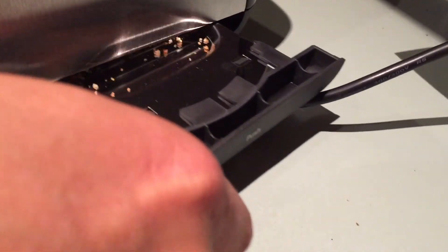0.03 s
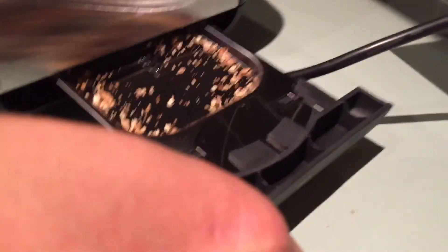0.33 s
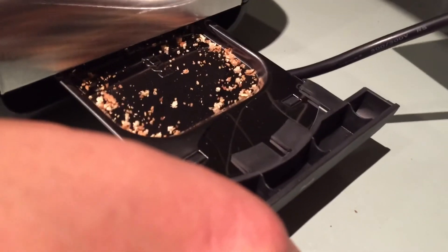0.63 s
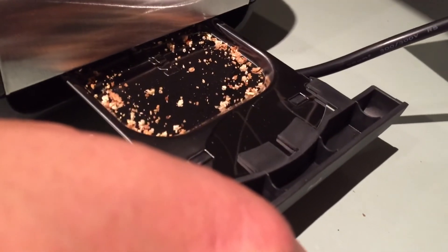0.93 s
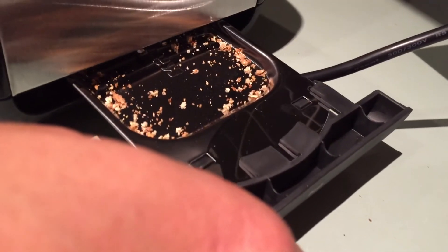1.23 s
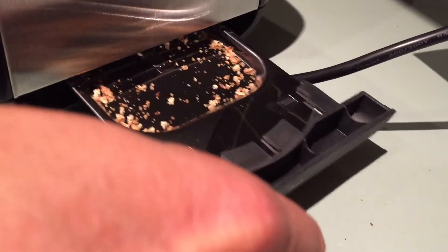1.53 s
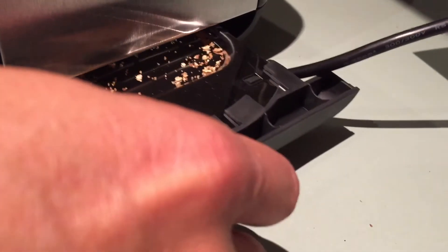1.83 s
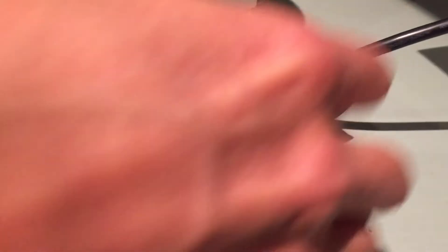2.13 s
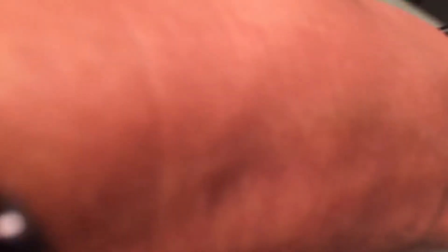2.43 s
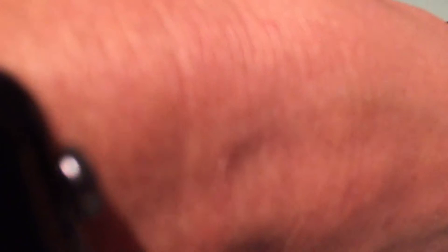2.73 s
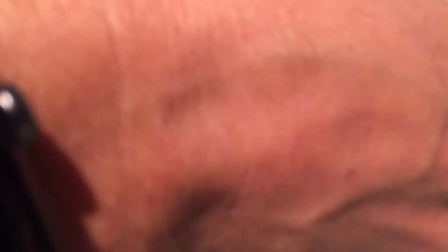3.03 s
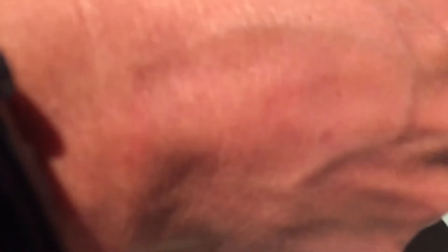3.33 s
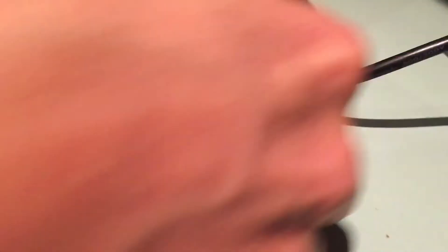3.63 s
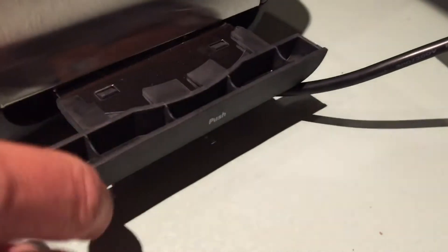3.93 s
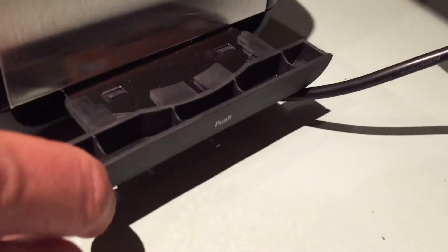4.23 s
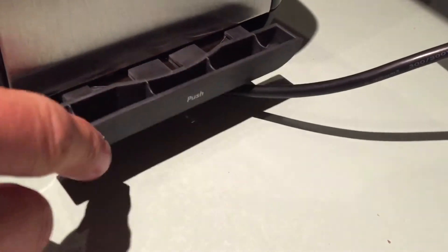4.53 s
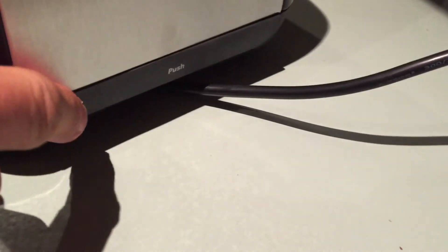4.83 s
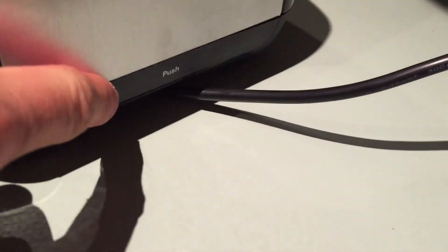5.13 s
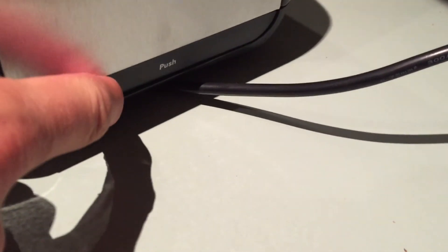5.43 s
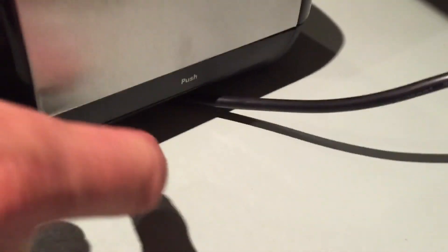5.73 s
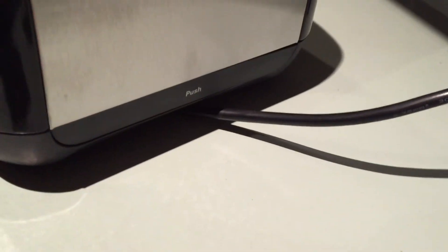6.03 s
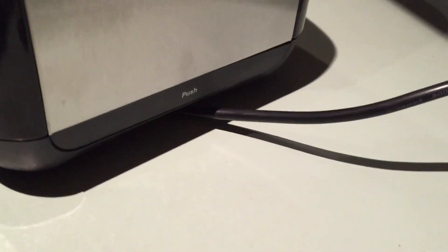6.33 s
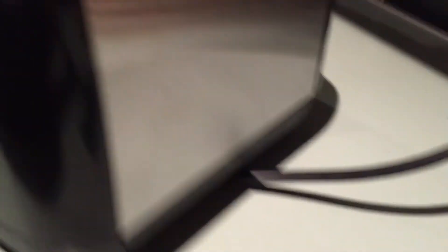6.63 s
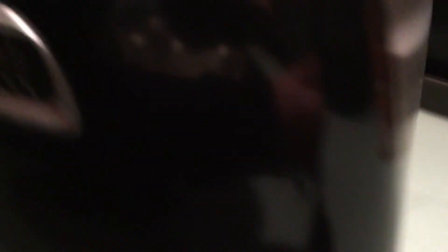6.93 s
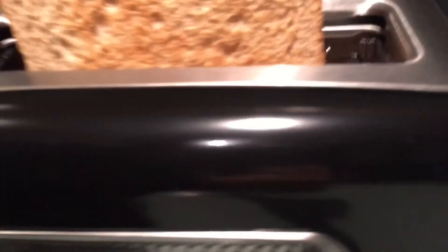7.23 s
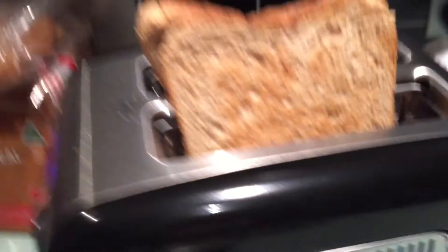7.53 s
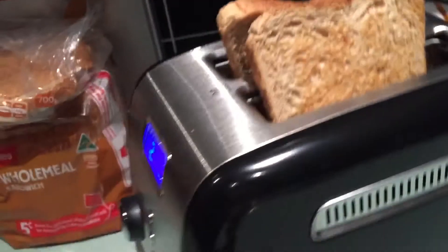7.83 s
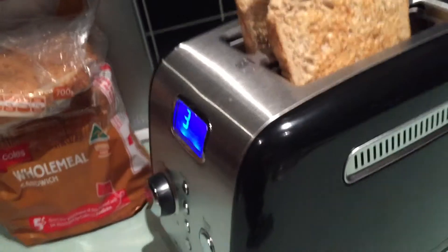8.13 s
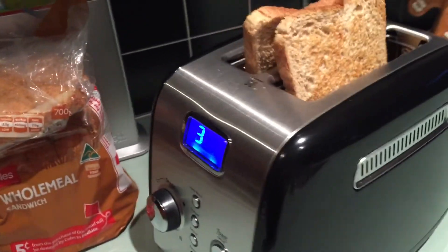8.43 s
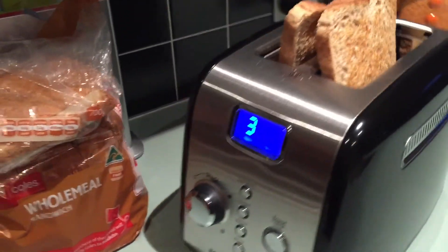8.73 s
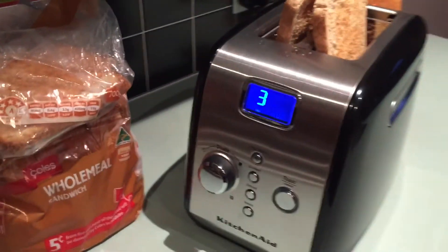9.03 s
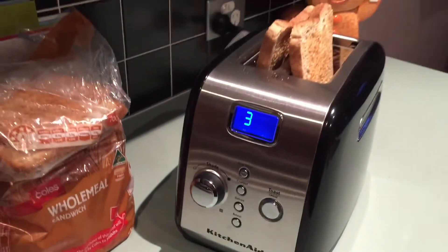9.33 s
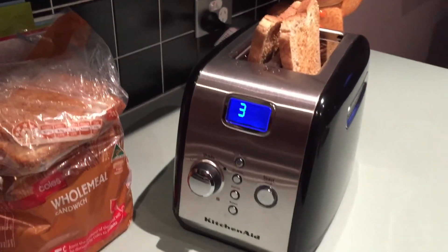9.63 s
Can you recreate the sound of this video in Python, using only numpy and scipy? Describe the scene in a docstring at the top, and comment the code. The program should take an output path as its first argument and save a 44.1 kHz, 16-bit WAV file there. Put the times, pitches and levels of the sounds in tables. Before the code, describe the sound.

Metal scraping, rattling knocks and sharp latch clicks as a thin tray is pulled from a toaster and pushed home.

```python
"""In a quiet kitchen, a toaster's crumb tray is pulled out to its stop, nudged back along its guides
and pressed home until the push latch clicks. Knocks shake the steel shell, and two jolts set the thin
tray ringing and toss up crumbs. Between knocks the tray grates, rasps and squeaks, and its plastic front
rubs. The toaster rocks on its feet with two low booms, and an appliance hums.
A hand-held phone hears it from close by and picks up soft handling bumps."""
import sys
import numpy as np
from scipy import signal
from scipy.fft import rfft, irfft, next_fast_len
from scipy.io import wavfile

SR = 44100
rng = np.random.default_rng(int(sys.argv[2]) if len(sys.argv) > 2 else 0)


def int16_out(signal):
    """Quantize to a 16-bit WAV file."""
    q = np.round(np.clip(np.atleast_2d(signal).T, -1, 1) * 32767)
    wavfile.write(sys.argv[1], SR, q.astype(np.int16))


N = 431298
T = np.arange(N) / SR
RING_T = T[:30000]  # the clock for one ringing sound, in seconds


def undb(db):
    """Turn decibels into a number to multiply by."""
    return 10 ** (np.asarray(db) / 20)


def unit(x):
    """Scale a sound so that its average power is 1."""
    return x / np.sqrt(np.mean(x ** 2))


def fade(t, decay):
    """Die away smoothly; a decay is the time it takes to drop by 60 dB."""
    return np.exp(-np.log(1000) * t / decay)


def add(track, s, sound):
    """Mix a sound into a track, starting at s seconds."""
    i = max(int(s * SR), 0)
    track[i:i + len(sound)] += sound[:N - i]


def colour(x, points):
    """Shape a sound's lows and highs along (f/Hz, level/dB) points; power 1."""
    hz, db = np.transpose(points)
    size = next_fast_len(len(x))
    f = np.maximum(np.fft.rfftfreq(size, 1 / SR), 1)
    gain = undb(np.interp(np.log(f), np.log(hz), db)) * np.minimum(f / hz[0], 1) ** 2
    return unit(irfft(rfft(x, size) * gain, size)[:len(x)])


def band(hz, width, size):
    """Noise around one pitch; power 1."""
    edges = np.clip([hz - width / 2, hz + width / 2], 20, SR / 2 - 100)
    bandpass = signal.butter(2, edges, "band", fs=SR, output="sos")
    return unit(signal.sosfilt(bandpass, rng.standard_normal(2 * size))[size:])


def walk(rate):
    """Wander at random by about 1, with `rate` new values a second."""
    points = rng.standard_normal(int(T[-1] * rate) + 2)
    return np.interp(T * rate, np.arange(len(points)), points)


def burst(hz, width, envelope):
    """A puff of noise with the shape and energy of the envelope, its loudness curve."""
    x = band(hz, width, len(envelope)) * envelope
    return unit(x) * np.sqrt(np.mean(envelope ** 2))


def ring(tones, force_db, clock=RING_T):
    """A struck part rings, each tone as hard as the force at its pitch; an uneven clock bends them."""
    return sum((-1) ** k * undb(db + force_db(hz)) * np.sin(2 * np.pi * hz * clock) * fade(RING_T, decay)
               for k, (hz, db, decay) in enumerate(tones))


def crash(bands, force_db, stretch=1, rise_cycles=0.68):
    """Crowded tones blur into puffs of noise; lows build up later, and stretch scales the decays."""
    t = RING_T[:len(RING_T) // 5]
    out = np.zeros(len(t))
    for hz, width, db, decay in bands:
        envelope = fade(t, decay * stretch) * (1 - np.exp(-t * hz / rise_cycles))
        out += undb(db + force_db(hz)) * burst(hz, width, envelope)
    return out


def slips(rate, spread_db):
    """Surfaces stick and slip: about `rate` clicks a second, of uneven size."""
    chance, size, sign = rng.random(N), rng.exponential(size=N), rng.standard_normal(N)
    return (chance < rate / SR) * undb(spread_db * np.minimum(size, 4)) * np.sign(sign)


def stroke(peak_s, rise_s, fall_s, depth_db=19):
    """Rubbing swells as a movement speeds up and dies as it slows."""
    away = np.maximum((peak_s - T) / rise_s, (T - peak_s) / fall_s)
    gain, moving = np.zeros(N), away < 2
    gain[moving] = undb(-depth_db * away[moving] ** 1.9)  # the power rounds the top
    return gain


def stirred(source, gain, tones, share, damping_s):
    """Rubbing, plus the tones it keeps ringing while the hand cuts their decay short."""
    response = ring(tones, lambda hz: 0) * fade(RING_T, damping_s)
    response = response / np.std(signal.fftconvolve(source[:SR], response)[:SR])
    return source * gain + share * signal.fftconvolve(source * gain, response)[:N]


# the lows and highs of still air: f/Hz, level/dB
AIR_COLOUR = [(15, -32), (25, -11), (55, 1.5), (75, -13), (152, -11), (221, -14.5), (289, -12.5),
              (322, -18.5), (410, -18.5), (445, -23), (614, -24.5), (2060, -28.5), (2630, -29.5),
              (8580, -36), (15500, -41.5)]
# an appliance's hum and whine: f/Hz, level/dB
HUM_TONES = [(50, -67.5), (100, -75.5), (149, -74), (293, -79.5), (2101, -86)]
def kitchen(air_db=-64):
    """Still air and the slightly wavering hum of an appliance."""
    air = undb(air_db + .5 * walk(5.0)) * colour(rng.standard_normal(N), AIR_COLOUR)
    hum = sum(undb(db + 2.1 * walk(1.6)) * np.sqrt(2) * np.sin(2 * np.pi * hz * T + 0.66 * walk(6.7))
              for hz, db in HUM_TONES)
    return air + hum


# the steel shell's tones: f/Hz, level/dB, decay/s
SHELL_TONES = [(160.5, -8.5, 0.16), (189.4, -8.5, 0.35), (248.6, -10.5, 0.5), (272.5, -1.5, 0.21),
               (401.2, -3, 0.25), (575, -14.5, 0.25), (596.4, -6.5, 0.19), (847, -7, 0.12),
               (904, -7, 0.096), (990, -13.5, 0.19), (1110, -16, 0.16), (1215, -11.5, .14),
               (1390, -14.5, 0.075), (1645, -17.5, 0.2), (1710, -13, 0.17), (1780, -13, 0.14),
               (2130, -25, 0.32), (2509, -23.5, 0.26), (2822, -17, 0.2)]
# the thin tray's tones; the lowest two throb slowly together: f/Hz, level/dB, decay/s
TRAY_TONES = [(405.2, -8.5, 0.83), (745, -10.5, 0.28), (406.9, -7.5, 0.9), (1438.5, -2, 0.46),
              (1830, -3, 0.18), (2340, -19.5, 0.68), (2660, -7.5, .17), (3290, -11, .2), (3587, -4.5, 0.14),
              (4040, -7.5, 0.21), (5040, -19.5, 0.19), (5230, -8, 0.3), (5400, -29, .45), (6555, -31, 0.5),
              (7025, -20, 0.218), (8400, -25, 0.37), (9451, -21.5, 0.17), (9800, -29, 0.28),
              (11700, -26.5, 0.22)]
# metal grating: f/Hz, level/dB
GRATE_COLOUR = [(59, -33.5), (100, -4), (140, 0), (273, 0.5), (483, -8.5), (572, -2.5), (755, -15),
                (855, -5), (1260, -13), (1450, -12.5), (1600, -11.5), (1790, -9), (2050, -16.5),
                (2400, -15), (3220, -25), (4000, -22.5), (5200, -49), (8800, -120)]
# plastic rubbing: f/Hz, level/dB
RUB_COLOUR = [(590, -36.5), (1000, -16), (1310, -8), (1780, -11), (2290, -11), (2740, -6.5), (2970, -6),
              (3520, 1.5), (4310, -5), (6130, -4.5), (7690, -16.5), (9110, -11.5), (10300, -20.5),
              (13500, -14.5), (15000, -16)]
# pulls and pushes: fastest t/s, speeding up/s, slowing down/s, grate level/dB, rub level/dB
SLIDES = [(.09, 0.13, 0.21, -50.5, -64), (0.184, 0.061, 0.085, -42, -44), (.352, 0.089, 0.084, -45, -59.5),
          (1.565, 0.054, 0.07, -53, -67), (1.665, 0.054, 0.05, -46, -54), (1.815, 0.051, 0.069, -53, -66),
          (2.035, 0.071, 0.059, -77, -62), (2.495, 0.022, 0.1, -57.5, -79), (2.85, 0.053, 0.3, -51.5, -71),
          (3.225, 0.059, 0.037, -54, -56.5), (3.389, 0.14, 0.099, -45, -58),
          (4.447, 0.072, 0.091, -37, -50), (4.57, 0.039, 0.033, -54.5, -52.5),
          (4.665, 0.048, 0.07, -36, -54), (4.85, 0.054, 0.13, -46.5, -72), (5.04, 0.15, 0.093, -46.5, -62),
          (5.16, 0.12, 0.25, -53, -88)]
def sliding(grate_gain_db=-4.5, rub_gain_db=-2):
    """Metal grates on the guides and stirs the shell; the plastic front hisses and stirs the tray."""
    grate_gain, rub_gain = np.zeros(N), np.zeros(N)
    for peak_s, rise_s, fall_s, grate_db, rub_db in SLIDES:
        speed = stroke(peak_s, rise_s, fall_s)
        grate_gain += speed * undb(grate_db + grate_gain_db)
        rub_gain += speed * undb(rub_db + rub_gain_db)
    grate = colour(slips(rate=2600, spread_db=2.5), GRATE_COLOUR)
    rub = colour(slips(rate=7700, spread_db=1.5), RUB_COLOUR) * undb(3 * walk(90))
    metal = stirred(grate, grate_gain, SHELL_TONES, share=0.5, damping_s=0.39)
    plastic = stirred(rub, rub_gain, TRAY_TONES, share=0.173, damping_s=0.26)
    return metal + plastic


def force(clack_db, thud_db, tick_db, boom_db):
    """How hard a hit drives each pitch: weight gives the low thud, a hard edge the high tick."""
    top_db = tick_db + 0.015 * min(tick_db - clack_db, 0)  # a soft edge loses a little more at the top
    pitches_hz = [190, 270, 430, 1000, 1750, 5500, 13000]
    levels_db = [thud_db + boom_db, thud_db, thud_db, clack_db, clack_db, tick_db, top_db]
    return lambda hz: np.interp(np.log(hz), np.log(pitches_hz), levels_db)


def rebounds(chatter_s, gap_s=.0075, fall_db=5.5):
    """The bounces in one knock as (delay/s, level/dB): they hold up at first, then die quickly."""
    gaps = gap_s * np.exp(.2 * rng.standard_normal(8))
    delays = np.cumsum(gaps) - gaps[0]
    return [(delay, -fall_db * (delay / chatter_s) ** 2)
            for delay in delays if delay < np.sqrt(2) * chatter_s]


def crack(force_db, hz=3804, width_hz=4600):
    """The dry click of two hard edges meeting."""
    envelope = fade(RING_T[:len(RING_T) // 20], decay=0.0076)
    return undb(0.5 + force_db(hz)) * burst(hz, width_hz, envelope)


# the casing's crowded, short tones: f/Hz, width/Hz, level/dB, decay before stretching/s
CASING_BANDS = [(169, 52, -2.5, 0.093), (273.2, 30, -2.5, 0.14), (400.3, 25.5, -4, 0.11),
                (595, 63, -5.5, 0.1), (851.6, 86, -5, 0.07), (1230, 640, -5.5, 0.084),
                (1730, 310, -6.5, 0.1), (2800, 920, -4.5, 0.095), (3900, 1300, -7, 0.12),
                (5650, 2000, -10.5, 0.072), (6680, 940, -7.5, 0.051), (8600, 1600, -13, 0.036),
                (12400, 3300, -13.5, 0.043)]
# the further the tray sticks out, the more it booms: t/s, bass level/dB
TRAY_BOOM = [(.2, 9), (1.7, 9), (2.7, 4), (4.4, -2), (4.75, -6.5)]
# the tray hits guides and stops: t/s, clack level/dB, thud level/dB, tick level/dB, chatter/s
TRAY_KNOCKS = [(0.141, -41, -42, -55, .003), (0.149, -33.5, -40.5, -47.5, 0.008),
               (.213, -28.5, -31, -30, .003), (.217, -23.5, -23.5, -19.5, 0.0065),
               (.245, -26, -32, -39.5, 0.012), (.357, -48, -58, -63, 0.0075),
               (0.41, -52.5, -51, -56, 0.0031), (0.464, -49.5, -53, -67, 0.0033),
               (.481, -66.5, -56.5, -78.5, 0.0031), (1.663, -31, -37.5, -56, 0.018),
               (1.691, -31.5, -58, -45.5, 0.003), (1.714, -52, -35.5, -58, 0.012),
               (1.736, -37, -45, -52.5, .003), (1.746, -67, -41.5, -64, 0.0086),
               (1.776, -62, -47, -75, .003), (2.034, -73, -47.5, -67, 0.00254),
               (2.669, -35.5, -38, -55.5, 0.029), (2.723, -24.5, -31, -47, .003),
               (2.729, -18, -25.5, -44, .003), (2.738, -23, -23, -42.5, .003),
               (2.745, -20, -22.5, -44, 0.0029), (2.753, -44, -23.5, -46, 0.0029),
               (2.764, -50, -29, -53, 0.012), (3.319, -53, -46, -59, .012), (3.371, -49, -54, -53, .006),
               (3.385, -50, -38, -58, 0.021), (3.505, -52, -45, -83, 0.003), (4.367, -55, -58, -63, .003),
               (4.434, -32.5, -31, -45, 0.016), (4.445, -39, -25, -49, .018),
               (4.664, -24.5, -20, -47.5, 0.003), (4.695, -29, -20.5, -37.5, 0.022),
               (4.713, -18, -19.5, -37, 0.0033), (4.718, -16.5, -15, -31.5, .003),
               (4.729, -19, -20, -37, .003), (4.7443, -28, -20, -20, 0.003), (4.748, -25, -26, -24, .003)]
def knocks(shell_db=-11, scatter_db=2.5):
    """The tray knocks and bounces: each bounce rattles the casing, and the shell rings on."""
    out = np.zeros(N)
    contacts = [rebounds(chatter_s) for *_, chatter_s in TRAY_KNOCKS]
    for (s, clack_db, thud_db, tick_db, _), bounces in zip(TRAY_KNOCKS, contacts):
        boom_db = np.interp(s, *np.transpose(TRAY_BOOM))
        force_db = force(clack_db - 2, thud_db - 1, tick_db + 2, boom_db)
        shove_db = force(clack_db - 3, thud_db - 1, tick_db, boom_db)
        for delay, db in bounces:
            add(out, s + delay, undb(db) * crash(CASING_BANDS, force_db, stretch=0.63))
        add(out, s, crack(force_db))
        # each spot that is hit favours other tones
        struck = lambda hz: shove_db(hz) + scatter_db * rng.standard_normal()
        delays, levels_db = np.transpose(bounces)
        shove = np.linalg.norm(undb(levels_db))  # the heavy shell feels all the bounces as one shove
        add(out, s + np.mean(delays), shove * undb(shell_db) * ring(SHELL_TONES, struck))
    return out


# thin squeaks: loudest t/s, swelling/s, dying/s, level/dB
TRAY_SQUEAKS = [(.203, 0.0125, 0.011, -53.5), (1.669, .025, .035, -59)]
def squeaks(hz=8530, width_hz=200):
    """The tray squeaks in its guides: noise so narrow that it is almost a whistle."""
    gain = sum(undb(db) * stroke(peak_s, rise_s, fall_s) for peak_s, rise_s, fall_s, db in TRAY_SQUEAKS)
    return gain * band(hz, width_hz, N)


# jolts that shake the whole tray: t/s, level/dB
TRAY_JOLTS = [(.217, -29.5), (1.667, -54)]
# the guide rail's tones, damped by the tray: multiple of its pitch, level/dB, decay/s
RAIL_TONES = [(1, 0, 0.12), (1.013, -5, 0.1), (.43, -10.5, 0.1), (.82, -19.5, .06)]
# the tray catches on the rail, whose pitch depends on where it is held: t/s, level/dB, f/Hz
RAIL_SNAGS = [(1.668, -47, 1800), (1.673, -37.5, 1200), (2.674, -31.5, 1755), (2.739, -32, 1760),
              (3.372, -47, 1795), (3.392, -50, 1795), (4.403, -45, 1745), (4.43, -31.5, 1515)]
def ringing(rattle_db=2.5, pitch_waver=.003):
    """A jolt leaves the tray ringing; a snag rings the rail."""
    out = np.zeros(N)
    strikes = [(s, db, TRAY_TONES) for s, db in TRAY_JOLTS]
    for s, db, hz in RAIL_SNAGS:
        rail = [(multiple * hz, tone_db, decay) for multiple, tone_db, decay in RAIL_TONES]
        strikes.append((s, db, rail))
    for s, db, tones in strikes:
        bend = pitch_waver * walk(70)[:len(RING_T)]  # the loose tray flexes in the hand
        add(out, s, ring(tones, lambda hz: db, RING_T + np.cumsum(bend) / SR))
    return out * undb(rattle_db * walk(110))  # loose metal touches its guides as it rings


# crumbs landing on the tray: f/Hz, level/dB
CRUMB_COLOUR = [(1500, -16), (3500, 3), (6500, 4.5), (9000, -5.5), (12000, 1), (15000, -5.5)]
def crumbs(gain_db=-22.5, flight_s=0.029):
    """Dry crumbs jump at each of the two jolts and patter down."""
    landing = np.zeros(N)
    for s, db in TRAY_JOLTS:
        add(landing, s, undb(db + gain_db) * RING_T / flight_s * np.exp(1 - RING_T / flight_s))
    return landing * colour(slips(rate=1400, spread_db=1.0), CRUMB_COLOUR)


# the rough tones of the tray's edge: multiple of the pitch, width/Hz, level/dB
EDGE_BANDS = [(0.371, 261, -10), (1, 239.5, 0.5), (1.15, 300, -2), (1.731, 795, -5.5), (2.32, 400, -12.5)]
# light glides: start t/s, length/s, level/dB, f/Hz
LIGHT_GLIDES = [(1.481, 0.11, -66, 3353), (1.787, 0.052, -67, 3780), (2.003, 0.04, -67, 3430),
                (2.929, 0.051, -63.5, 3390), (3.176, 0.072, -56.5, 3500), (3.696, 0.11, -57.5, 3480),
                (4.371, .085, -62.5, 3618), (4.537, 0.046, -66.5, 3370), (4.959, 0.14, -60, 2740)]
def rasping(ramp_s=0.02):
    """Under light pressure the tray's edge rasps in a few narrow bands."""
    out = np.zeros(N)
    for s, length_s, db, hz in LIGHT_GLIDES:
        t = T[:int(length_s * SR)]
        envelope = np.minimum(np.minimum(t, length_s - t) / ramp_s, 1)
        rasp = sum(undb(edge_db) * band(multiple * hz, width, len(t))
                   for multiple, width, edge_db in EDGE_BANDS)
        add(out, s, undb(db) * envelope * unit(rasp))
    return out


# skin on plastic: f/Hz, level/dB
SKIN_COLOUR = [(470, -33), (800, -15), (985, -20), (1200, -10), (1590, -22), (1780, -6), (2300, -9),
               (3570, -6), (15000, -18)]
# brushes of the hand: fastest t/s, speeding up/s, slowing down/s, level/dB
SKIN_BRUSHES = [(2.29, 0.2, 0.39, -64), (3.75, 0.07, 0.11, -54.5), (3.89, 0.052, 0.24, -67)]
def brushing():
    """Skin slides over the plastic front with a smooth, high hiss."""
    gain = sum(undb(db) * stroke(peak_s, rise_s, fall_s) for peak_s, rise_s, fall_s, db in SKIN_BRUSHES)
    return gain * colour(rng.standard_normal(N), SKIN_COLOUR) * undb(2.3 * walk(54))


# the phone case's dull tones: f/Hz, width/Hz, level/dB, decay/s
PHONE_BANDS = [(169, 143, 0.5, 0.33), (312, 128, -2.5, 0.25), (583, 240, -13, 0.29), (940, 570, -6, 0.24),
               (1580, 1600, -13.5, 0.19)]
# two low, soft booms as the toaster rocks on its feet, then hands bump worktop and phone:
# t/s, boom level/dB, knock level/dB, boom f/Hz
SOFT_BUMPS = [(4.49, -46, -75, 112), (4.8, -47.5, -77, 72), (5.967, -40.5, -79, 57.6),
              (6.399, -45.5, -52.5, 109), (6.49, -53.5, -74, 166.5), (6.642, -53, -62, 150),
              (7.153, -51.5, -62, 74.3), (7.965, -49, -50, 150), (8.809, -56, -60.5, 106.6),
              (8.904, -39.5, -59, 93.4), (8.942, -56, -51, 127), (9.028, -52, -83, 108.4)]
def bumps(swell_s=0.02):
    """Each soft bump is a low, swelling boom with a dull knock."""
    out = np.zeros(N)
    t = RING_T[:len(RING_T) // 2]
    envelope = t / swell_s * np.exp(1 - t / swell_s)
    for s, boom_db, knock_db, hz in SOFT_BUMPS:
        add(out, s, undb(boom_db) * burst(hz, 0.53 * hz, envelope))
        add(out, s, crash(PHONE_BANDS, lambda hz: knock_db, rise_cycles=0.76))
    return out


# the plastic catch's snap: f/Hz, width/Hz, level/dB, decay/s
CATCH_BANDS = [(1782, 400, -18.5, 0.05), (2690, 670, -5.5, 0.055), (3346, 730, -6.5, 0.031),
               (5050, 1300, -5.5, 0.019), (6870, 1400, -4, 0.02), (9230, 860, -11.5, 0.038),
               (12400, 3000, -6.5, 0.019)]
# the latch spring's tones: f/Hz, level/dB, decay/s
SPRING_TONES = [(4100, -16.5, .05), (4430, -3.5, 0.058), (4556, -3.5, 0.059)]
# the plastic front's tones: f/Hz, level/dB, decay/s
FRONT_TONES = [(579, -1, 0.07), (810, -9.5, 0.046), (1070, -5.5, 0.023), (1642, -9.5, .045),
               (1894, -9, .045)]
# latch clicks: t/s, then level/dB of the clack, thud, snap, spring and front
LATCH_CLICKS = [(4.748, -21, -25.5, -40, -44, -38), (5.2512, -35, -33.5, -25.5, -24, -44.5),
                (5.597, -33, -34.5, -54, -63.5, -25), (5.617, -34.5, -24.5, -22.5, -32.5, -43),
                (5.7502, -57, -58.5, -36.5, -68, -69)]
def latch(shell_db=-8.5):
    """Pressed home, the catch snaps over; let go, the front knocks back and the catch takes the load."""
    out = np.zeros(N)
    for s, clack_db, thud_db, snap_db, spring_db, front_db in LATCH_CLICKS:
        force_db = force(clack_db, thud_db, tick_db=clack_db - 18, boom_db=-2.5)
        add(out, s, undb(shell_db) * ring(SHELL_TONES, force_db))
        add(out, s, crash(CASING_BANDS, force_db, stretch=0.91))
        add(out, s, crack(force_db))
        add(out, s, crash(CATCH_BANDS, lambda hz: snap_db, rise_cycles=0.58))
        add(out, s, ring(SPRING_TONES, lambda hz: spring_db))
        add(out, s, ring(FRONT_TONES, lambda hz: front_db))
    return out


# faint ticks and scuffs: t/s, level/dB, f/Hz, decay/s
FAINT_TICKS = [(7.16, -56.5, 3000, 0.14), (8.11, -67, 3360, 0.29), (8.365, -65, 1290, 0.44),
               (8.371, -65.5, 5900, 0.37), (8.601, -57.5, 10650, 0.03), (8.604, -56.5, 2320, 0.34)]
def ticks():
    """Tiny ticks and scuffs, each a dying puff of noise around one pitch."""
    out = np.zeros(N)
    for s, db, hz, decay in FAINT_TICKS:
        envelope = fade(RING_T, decay) * (1 - np.exp(-RING_T / (0.0011 * decay)))
        add(out, s, undb(db) * burst(hz, 0.5 * hz, envelope))
    return out


# the kitchen's echo: f/Hz, level/dB, decay/s
ECHO_BANDS = [(144.2, -15.5, 0.72), (413, -10.5, 0.43), (1110, -10, 0.29), (2556, -16.5, 0.41),
              (6010, -17.5, 0.13), (13030, -21, .22)]
def room(x):
    """Tiles and worktop send back a short, blurred echo whose highs die sooner than its lows."""
    build_up = 1 - np.exp(-(RING_T / 0.012) ** 2)
    tail = np.zeros(len(RING_T))
    for hz, db, decay in ECHO_BANDS:
        echo = unit(band(hz, 0.8 * hz, len(RING_T)) * fade(RING_T, decay) * build_up)
        tail += undb(db) * echo * np.sqrt(2 * hz / SR / len(RING_T))  # wider bands get more energy
    return x + signal.fftconvolve(x, tail)[:N]


def scene():
    """The toaster and the hands echo in the kitchen, over its air and hum."""
    background = kitchen()
    slide = sliding()
    edge = (rasping() + squeaks()) * undb(2.5 * walk(160))  # a fast flicker makes both sound rough
    nearby = slide + edge + brushing() + bumps() + ticks() + latch() + knocks() + ringing() + crumbs()
    return (background + room(nearby))[None]


def record(dry, low_cut_hz=42, top_hz=15300):
    """The phone softens the deep bass and cuts off the highest treble."""
    thinned = signal.sosfilt(signal.butter(3, low_cut_hz, "high", fs=SR, output="sos"), dry)
    return signal.sosfilt(signal.ellip(10, .2, 70, top_hz, fs=SR, output="sos"), thinned)


dry = scene()
out = record(dry)
int16_out(out)
```